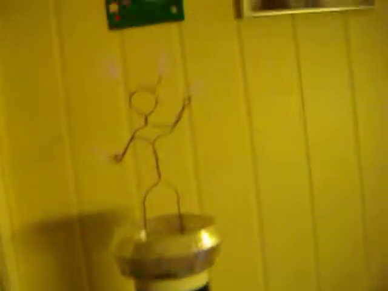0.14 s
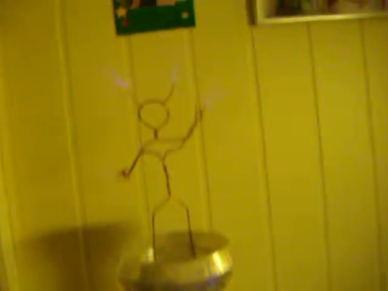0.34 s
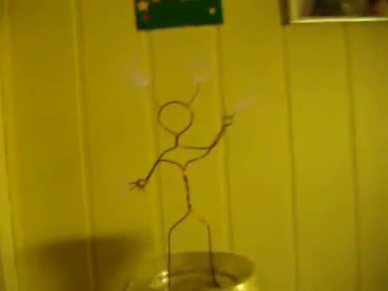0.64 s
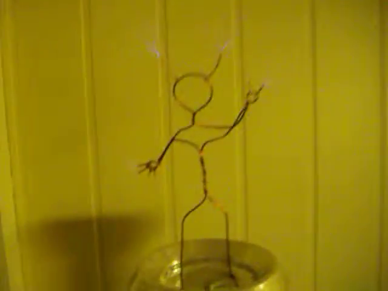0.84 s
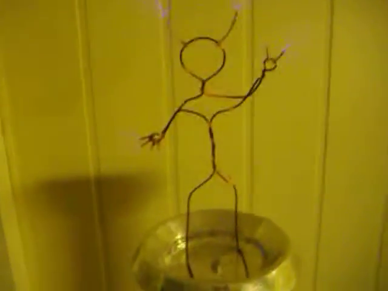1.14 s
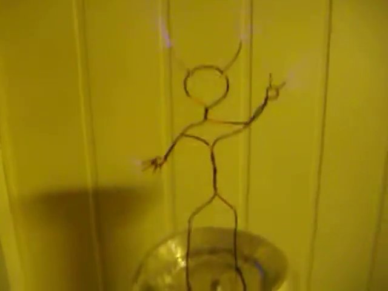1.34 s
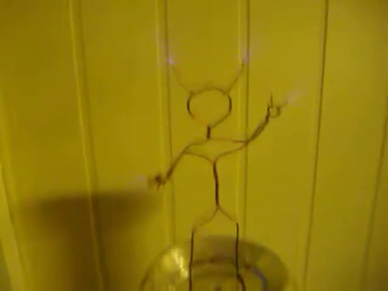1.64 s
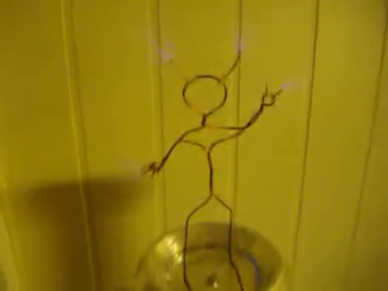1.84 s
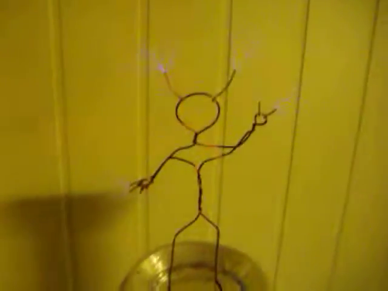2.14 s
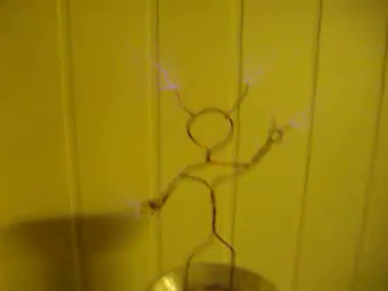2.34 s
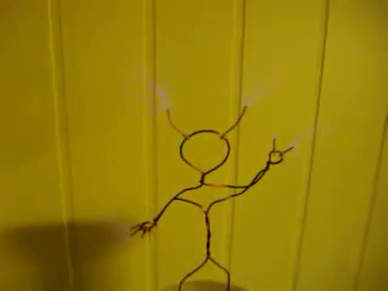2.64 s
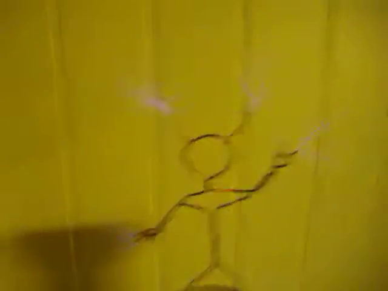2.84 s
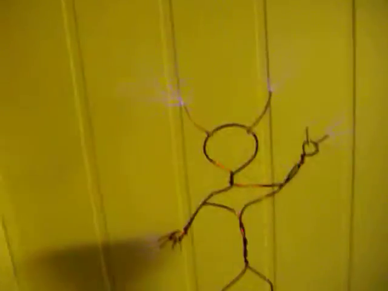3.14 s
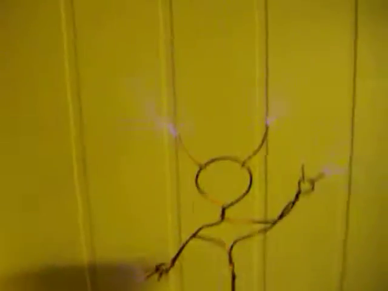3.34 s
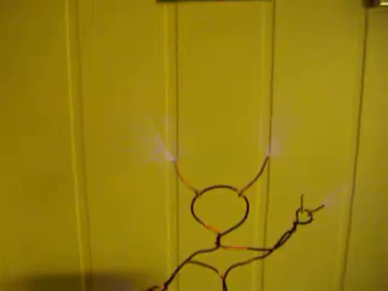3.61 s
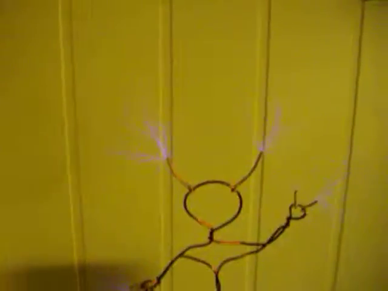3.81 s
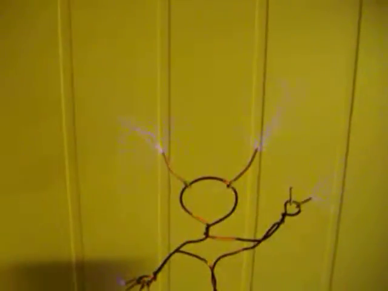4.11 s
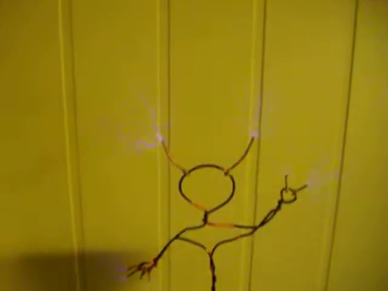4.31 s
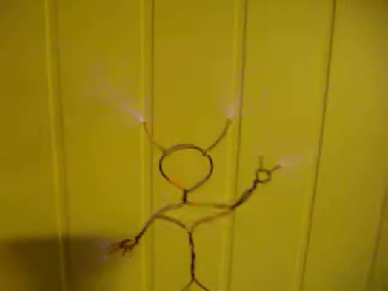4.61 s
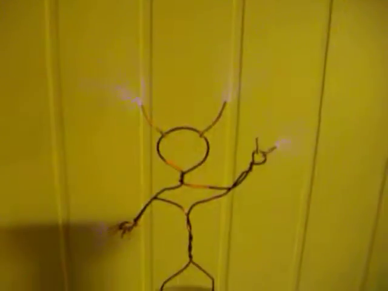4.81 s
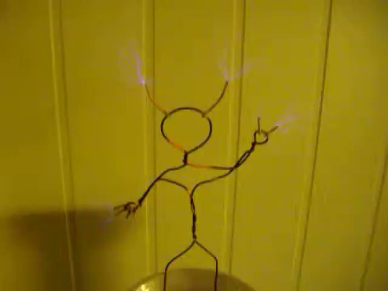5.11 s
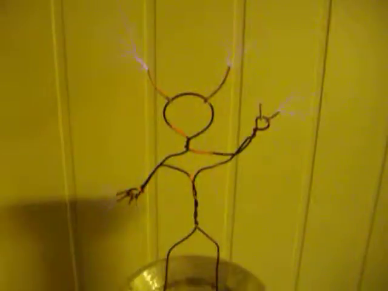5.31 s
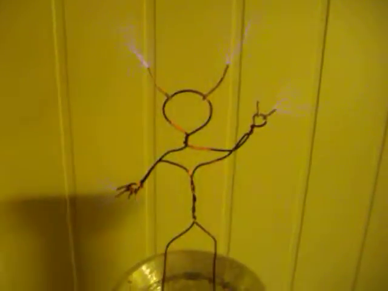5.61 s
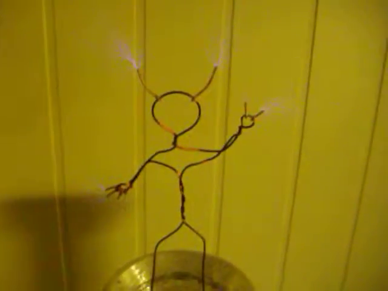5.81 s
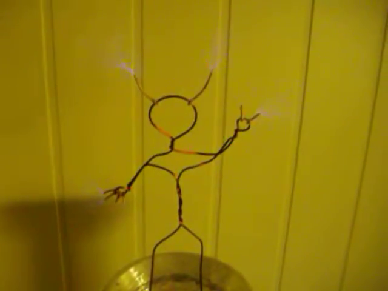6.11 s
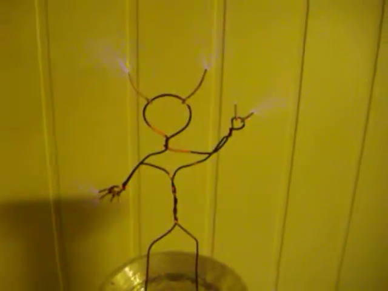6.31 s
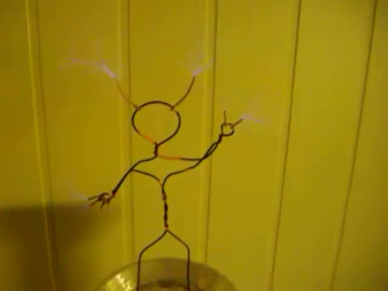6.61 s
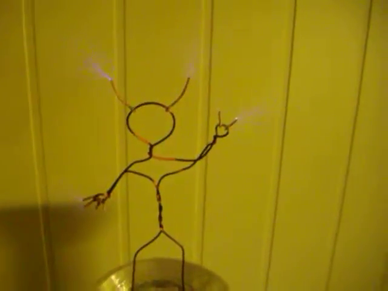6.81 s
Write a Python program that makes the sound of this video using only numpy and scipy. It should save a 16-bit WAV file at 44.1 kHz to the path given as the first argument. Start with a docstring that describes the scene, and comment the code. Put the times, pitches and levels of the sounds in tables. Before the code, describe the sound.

A spark-gap coil runs nonstop, a raw, rasping machine-gun rattle of electric snaps, boxy and overloaded, turning brighter and crisper as the microphone nears.

```python
"""Sharp bangs rattle at about a hundred a second: a spark-gap coil heard in a small panelled room.
The gap breaks down once in most half-cycles of the mains, at times twice. Each bang is an impulse that
excites resonances, with a snap of streamers, echoes off nearby surfaces and decaying-noise reverberation.
A hand-held microphone comes closer; beneath lie transformer hum and a low rumble.
A voice-band converter limits the band, and the strongest bangs clip."""
import sys
import numpy as np
from scipy import signal
from scipy.fft import rfft, irfft, next_fast_len
from scipy.io import wavfile
from scipy.ndimage import map_coordinates

SR = 44100
rng = np.random.default_rng(int(sys.argv[2]) if len(sys.argv) > 2 else 0)


def output_pcm(signal):
    """Save a mono or channel-first signal as 16-bit PCM at the path in sys.argv[1].

    Samples are clipped to [-1, 1] before scaling.
    """
    pcm = np.clip(np.atleast_2d(signal).T, -1, 1) * 32767
    wavfile.write(sys.argv[1], SR, np.round(pcm).astype(np.int16))


N = 306495

FIRING_HZ = 99.93  # half-cycles of the mains a second
LAG = .40  # mean moment of firing (share of a half-cycle)
CEILING = .71  # level at which the recorder clips
RISE_S = .0002  # the recorded peak comes this long after the bang arrives
# running coil: (time [s], mean bang [dB re ceiling], thump re crack at the ceiling [dB], closeness [0-1])
COIL = [(0, -2.5, -1, 0.34), (.6, -3, 0, 0.39), (1.2, -2, 2, 0.4), (2, -2, 2.5, 0.57),
        (2.6, -0.5, 3.5, 0.61), (3.5, -0.3, -2, 0.83), (4.5, 0.6, -1, 0.74), (5.5, -1, -0.5, 0.83),
        (6.95, -0.7, 1, 0.72)]
# low resonance that sinks as the microphone sets off: (time [s], centre [Hz], width [Hz], level [dB])
SINKING = [(.1, 975, 73, 8.5), (.45, 923, 108.4, 8.5), (.75, 866, 71.5, 6.5), (1.3, 840, 80.6, -4)]
SINKING_END_S = 1.8  # gone by then
# voice-band converter: (frequency [Hz], gain [dB])
BAND_EDGE = [(20, -26), (250, 0), (450, 4.5), (550, 2), (4800, 4), (5200, -0.5), (5600, -8.5),
             (5800, -17.5), (6000, -19), (6400, -44.5), (7000, -75.5), (22050, -120)]


def amp(db):
    """Decibels are twenty times the logarithm of an amplitude ratio; this inverts them."""
    return 10 ** (np.asarray(db) / 20)


def along(points, hz):
    """Linear interpolation of (frequency [Hz], value) points on a logarithmic frequency axis."""
    f, v = np.transpose(points)
    return np.interp(np.log(hz + 1), np.log(f + 1), v)


def read(rows, s):
    """Linear interpolation in time of each column of a curve, at the times s."""
    at, *columns = np.transpose(rows)
    return [np.interp(s, at, column) for column in columns]


def filtered(x, response):
    """Linear filtering: the spectrum of x times a complex frequency response."""
    size = 2 * next_fast_len(N // 2 + SR // 4)
    hz = np.fft.rfftfreq(size, 1 / SR)
    return irfft(rfft(x, size) * response(hz), size)[..., :N]


def resonances(modes):
    """Superposition of damped second-order resonators (centre [Hz], width [Hz], level [dB])."""
    return lambda f: sum(amp(db) * 1j * f * w / (hz * hz - f * f + 1j * f * w) for hz, w, db in modes)


def causal(points):
    """Minimum phase: folding the cepstrum makes the given (frequency [Hz], gain [dB]) causal."""
    def response(hz):
        cepstrum = irfft(along(points, hz) * np.log(10) / 20)
        half = len(cepstrum) // 2
        return np.exp(rfft(cepstrum * np.r_[1, np.full(half - 1, 2), 1, np.zeros(half - 1)]))
    return response


def pulses(s, size):
    """Band-limited interpolation: windowed sinc impulses fall between the samples."""
    at = s * SR
    taps = np.floor(at)[:, None] + np.arange(-7, 9)
    offset = taps - at[:, None]
    shape = np.sinc(offset) * np.cos(np.pi * offset / 16) ** 2
    index = np.clip(taps, 0, N).astype(int).ravel()
    return np.bincount(index, (size[:, None] * shape).ravel(), N + 1)[:N]


def height(response):
    """Peak of the impulse response: the recorded pressure of a unit bang with this response."""
    click = filtered(signal.unit_impulse(N), lambda hz: response(hz) * causal(BAND_EDGE)(hz))
    return click[:round(2 * RISE_S * SR)].max()


def firings():
    """Gap breakdown and recharge: times and strengths (dB re ceiling) of all bangs."""
    # bangs that stand out as overloads: (time [s], level [dB over the ceiling])
    hard_bangs = [(0.6338, 0.1), (1.0846, 1.2), (1.6944, 0.9), (1.815, 1.8), (1.9448, 0.9), (2.1253, 0.8),
                  (2.3051, 1.3), (2.3463, 2.1), (2.5051, 0.8), (2.6257, 2.5), (2.7862, 1.3), (2.8461, 1.4),
                  (2.8659, 1.6), (2.926, 2.0), (2.936, 2.0), (2.9462, 2.5), (3.0062, 1.8), (3.0857, 1.9),
                  (3.0957, 1.9), (3.1463, 1.5), (3.2159, 1.9), (3.2856, 1.8), (3.3258, 1.3), (3.4373, 1.7),
                  (3.4964, 1.5), (3.6859, 1.4), (3.766, 1.8), (3.9674, 2.1), (4.006, 1.7), (4.0972, 1.8),
                  (4.287, 2.0), (4.3084, 1.5), (4.3265, 2.1), (4.3666, 1.4), (4.458, 1.4), (4.5344, 2.4),
                  (4.6176, 2.2), (4.6874, 1.6), (4.7179, 1.4), (4.8083, 2.8), (4.8273, 1.6), (4.8679, 1.6),
                  (4.8781, 1.6), (4.9274, 1.9), (4.9682, 2.0), (4.9978, 1.7), (5.0088, 2.6), (5.0278, 1.9),
                  (5.0385, 1.4), (5.0577, 1.5), (5.068, 1.9), (5.1375, 1.7), (5.1683, 2.4), (5.2776, 1.6),
                  (5.3081, 2.3), (5.3775, 1.7), (5.3882, 1.3), (5.4276, 1.9), (5.4491, 1.6), (5.5379, 1.6),
                  (5.5487, 1.5), (5.6078, 2.3), (5.6279, 1.6), (5.6671, 1.6), (5.7478, 1.6), (5.7697, 2.3),
                  (5.7973, 1.4), (5.8504, 1.5), (5.8672, 2.2), (5.8977, 2.7), (5.9281, 2.3), (5.9682, 1.9),
                  (5.9876, 2.1), (6.0288, 1.8), (6.1485, 2.5), (6.2099, 1.5), (6.249, 2.7), (6.3186, 1.3),
                  (6.3791, 2.4), (6.4295, 2.1), (6.4688, 2.3), (6.4992, 2.2), (6.5984, 1.7), (6.6089, 2.1),
                  (6.6286, 2.4), (6.7487, 2.3), (6.7707, 1.9), (6.8386, 1.8), (6.8488, 1.4), (6.8698, 2.6),
                  (6.8895, 1.5), (6.9105, 2.4)]
    # strongest second firings: (time [s], level [dB re ceiling])
    double_bangs = [(0.0775, -3.2), (0.1371, -1.2), (0.3263, -0.4), (0.3465, -2.2), (0.387, -3.3),
                    (0.4159, -2.0), (0.4366, -2.2), (0.4574, -2.5), (0.5062, -1.9), (0.5558, -3.4),
                    (0.6973, -0.9), (0.7372, -3.6), (0.7869, -2.1), (0.8771, -3.5), (0.906, -2.2),
                    (0.927, -1.7), (1.0067, -2.2), (1.148, -2.7), (1.1688, -2.7), (1.1861, -1.2),
                    (1.208, -1.2), (1.3272, -2.8), (1.3979, -3.2), (1.4467, -1.4), (1.5068, -2.7),
                    (1.5878, -2.9), (1.617, -3.2), (1.6971, -3.1), (1.7273, -3.2), (1.8973, -3.4),
                    (1.948, -3.1), (2.31, -1.9), (2.3271, -1.6), (2.418, -1.2), (2.5175, -0.3),
                    (2.5581, -4.9), (2.6787, -3.8), (2.7091, -3.7), (2.7388, -4.0), (2.8089, -5.3),
                    (2.9692, -3.9), (3.0296, -3.9), (3.0597, -3.0), (3.1599, -3.9), (3.178, -2.8),
                    (3.2284, -5.3), (3.2585, -2.4), (3.3305, -5.1), (3.3688, -1.6), (3.4177, -1.4),
                    (3.5988, -4.8), (3.6397, -4.5), (3.7202, -5.3), (3.7973, -8.5), (4.0096, -5.2),
                    (4.0503, -2.4), (4.0785, -3.7), (4.1391, -3.5), (4.1796, -5.5), (4.2996, -3.7),
                    (4.5193, -2.0), (4.5379, -1.0), (4.5699, -2.9), (4.5982, -1.4), (4.6493, -5.0),
                    (5.0902, -3.4), (5.1503, -2.9), (5.5804, -2.5), (5.6415, -5.6), (5.6795, -3.6),
                    (5.7112, -2.6), (5.7599, -2.3), (5.8009, -5.6), (5.8296, -2.3), (6.0811, -3.6),
                    (6.1203, -3.6), (6.1387, -3.5), (6.2004, -1.9), (6.2804, -4.1), (6.5514, -2.9),
                    (6.5816, -3.1), (6.6416, -3.9), (6.7208, -3.8), (6.7385, -2.8), (6.7603, -2.9),
                    (6.942, -5.5)]
    # half-cycles without their usual firing: (time [s])
    skipped = [3.787, 4.527, 6.128, 6.729]
    # chance of a further, weaker second firing where none is excluded: (time [s], chance [0-1])
    twice_chance = [(0, .8), (1.3, .6), (1.6, .2), (2.5, .12), (2.7, .04)]
    # upper limit of an ordinary first bang: (time [s], level [dB re ceiling])
    usual_top = [(1, -2), (2.7, .6)]
    # single firing: (time [s], mean moment [share of a half-cycle], scatter [share of a half-cycle])
    timing = [(0, .41, .028), (1.2, .37, .028), (3, .39, .045), (6.95, .40, .06)]
    # a later breakdown has charged further: (time [s], gain for one scatter of delay [dB])
    later_gain = [(2.5, 0), (4, .9)]
    early, late = .055, .085  # lead before a second firing, lag after one (shares of a half-cycle)
    spread_db, drain = 1.5, .6  # scatter of bangs; share of a bang's surplus the next one lacks
    second_mean_db, second_spread_db = -3, 2.2  # second firing re the mean bang, and its scatter
    strong_wait_s = .0028  # least wait before a strong second firing
    recharge_s, recharge_spread_s, recharge_min_s = .0031, .0006, .0022

    cycle = np.arange(int(N / SR * FIRING_HZ))
    cycle_s = cycle / FIRING_HZ
    luck, spread = rng.random(len(cycle)), rng.standard_normal((len(cycle), 4))
    level_db = read(COIL, cycle_s)[0]
    twice, = read(twice_chance, cycle_s)
    top_db, = read(usual_top, cycle_s)

    def slot(s, lag):
        return np.clip(np.round(s * FIRING_HZ - lag).astype(int), 0, len(cycle) - 1)

    hard, hard_db = np.transpose(hard_bangs)
    double, double_db = np.transpose(double_bangs)
    at_hard, at_double = slot(hard, LAG), slot(double, LAG + .2)

    # a double firing drains the charge: no further double is drawn next to one
    listed = np.isin(cycle, at_double)
    again = (luck < twice) & ~np.roll(listed, 1) & ~np.roll(listed, -1)
    for k in cycle[1:]:
        again[k] &= ~again[k - 1]
    again[at_double] = True

    # an early breakdown leaves time to recharge and fire again; the next half-cycle then starts late
    moment, scatter = read(timing, cycle_s)
    stray = np.where(spread[:, 0] > 0, 1.3, .7)  # late ones stray further
    delay = np.where(again, -abs(spread[:, 0]) / 2, spread[:, 0] * stray)
    shift = scatter * delay - early * again + late * np.roll(again, 1)
    first = (cycle + moment + shift) / FIRING_HZ

    level_db = level_db + read(later_gain, first)[0] * delay
    surplus = spread[:, 1] - drain * np.roll(spread[:, 1] + again, 1)
    first_db = np.minimum(level_db + spread_db * np.minimum(surplus, 1), top_db)
    recharge = np.maximum(recharge_s + recharge_spread_s * spread[:, 2], recharge_min_s)
    first[at_double] = np.minimum(first[at_double], double - strong_wait_s)
    first[at_hard], first_db[at_hard] = hard, hard_db

    second = first + recharge
    second_db = np.minimum(level_db + second_mean_db + second_spread_db * spread[:, 3], level_db)
    second[at_double], second_db[at_double] = double, double_db

    fired = ~np.isin(cycle, np.setdiff1d(slot(np.array(skipped), LAG), at_hard))
    times = np.r_[first[fired], second[again]] - RISE_S
    return times, np.r_[first_db[fired], second_db[again]]


def bangs():
    """Impulse excitation: each firing drives crack, thump and rings, with streamers and early echoes."""
    # microphone port, upper resonances near and far: (centre [Hz], width [Hz], level [dB])
    near_port, far_port = [(2840, 1360, -3.5), (4110, 530, -4.5)], [(2730, 2500, 2), (3900, 1400, -5)]
    # recorder body, lower resonances: (centre [Hz], width [Hz], level [dB])
    near_body = [(292, 920, -6), (721, 347, 5), (950, 3900, -7)]
    # snap of the streamers: (time [s], mean level re the bang [dB])
    streamers = [(0, -19), (1, -19), (4, -12.5), (5, -7.5), (6.95, -6.5)]
    snap_delay_s, snap_jitter_s, snap_spread_db = .00029, .00004, 2

    s, db = firings()
    luck = rng.standard_normal((len(s), 3))
    _, thump_db, closeness = read(COIL, s)
    times, gains = paths(s)
    # a longer arc heats more air: the thump grows faster than the crack
    heat = amp(thump_db + 0.46 * db + 0.98 * luck[:, 0])
    low = np.interp(closeness, [0, 1], [height(far_thump), height(resonances(near_body))])
    for share, row in zip(stations(s), SINKING):
        low += share * height(resonances([row[1:]]))
    high = np.interp(closeness, [0, 1], [height(resonances(far_port)), height(resonances(near_port))])
    sharp = CEILING * amp(db) / (high + heat * low)  # crack and thump together make up the peak

    # the streamers at the wire tips lie at other distances than the gap
    snap_db, = read(streamers, s)
    late = np.resize(snap_delay_s + snap_jitter_s * luck[:, 1], len(times))
    snap = np.resize(sharp * amp(snap_db + snap_spread_db * luck[:, 2]), len(times)) * gains
    crack = pulses(times, np.resize(sharp, len(times)) * gains) + pulses(times + late, snap)
    thump = pulses(times, np.resize(sharp * heat, len(times)) * gains)

    # cross-fade from far to near
    close = np.clip(read(COIL, np.arange(N) / SR)[2], 0, 1)
    body = filtered(close * thump, resonances(near_body)) + filtered((1 - close) * thump, far_thump)
    port = filtered(close * crack, resonances(near_port))
    port += filtered((1 - close) * crack, resonances(far_port))
    return -(port + body + sinking_resonance(thump) + bowl_rings(s, sharp))


def paths(s):
    """Specular reflection: arrival times and gains by the direct path, the wall and six surfaces."""
    # echo of the panels behind the coil: (time [s], level [dB])
    wall_level = [(0, -9), (1, -7.5), (1.9, -5.5), (2.9, -7), (3.8, -6), (4.6, -7.5), (6.95, -8)]
    wall_delay_s = .00144
    # six more surfaces as the microphone moves: (time [s], then six pairs of delay [ms], level [dB])
    near_surfaces = [(.1, .73, -16, 3, -17.5, 2.8, -25, 2.7, -20.5, 4.7, -16.5, 7.7, -13),
                     (.5, .73, -17, 2.11, -11.5, 2.3, -20, 3.2, -12.5, 5.3, -23, 6.3, -29),
                     (.95, .75, -15, 1.6, -25, 2.23, -14.5, 3.2, -17, 4.7, -29.5, 5.7, -32),
                     (1.3, .73, -16, 2.2, -15, 2.3, -16, 3.27, -12.5, 5.4, -26, 6.8, -15),
                     (1.7, .75, -27, 1.6, -17, 2.64, -22, 3.33, -15.5, 4.8, -19, 9.9, -9),
                     (2.15, .75, -26, 2.23, -27.5, 2.83, -20.5, 3.36, -17.5, 5.44, -23, 6.6, -17),
                     (2.55, 0.8, -18.5, 2.4, -24, 3.27, -16, 3.38, -20.5, 5.42, -23.5, 7.6, -15),
                     (2.9, 0.934, -18.5, 1.9, -14.5, 2.7, -18, 3, -20, 5.53, -17.5, 7.4, -17),
                     (3.3, .9, -28, 2.09, -19, 3.2, -28, 3.47, -22, 5.51, -15, 9.5, -22),
                     (3.75, 0.76, -27, 2.09, -18, 3.54, -12.5, 2.8, -19, 5.1, -20.5, 9.7, -16),
                     (4.3, .92, -22.5, 2.02, -20, 3.02, -13.5, 2.1, -43, 5, -20.5, 7.15, -23),
                     (4.9, .94, -17, 1.4, -16, 3, -19, 1.8, -28.5, 5.16, -21.5, 7.5, -17.5),
                     (5.8, 0.98, -16.5, 1.863, -12.5, 2.93, -17.5, 3.7, -26, 5.14, -16.5, 7.4, -17),
                     (6.95, 0.95, -15.5, 1.84, -15.5, 2.92, -17, 3, -22, 4.9, -25.5, 7.55, -15)]
    moving = np.array(read(near_surfaces, s))
    times = np.r_[s, s + wall_delay_s, (s + moving[::2] / 1000).ravel()]
    gains = np.r_[np.ones(len(s)), amp(read(wall_level, s)[0]), amp(moving[1::2]).ravel()]
    return times, gains


def far_thump(hz, cut_hz=420):
    """Resonance under a second-order high-pass: from farther off the thump loses its bass."""
    # lower resonance from farther off: (centre [Hz], width [Hz], level [dB])
    far_body = [(640, 210, 3)]
    return resonances(far_body)(hz) * (1j * hz / (cut_hz + 1j * hz)) ** 2


def stations(s):
    """Linear cross-fade: share of each station of the sinking resonance at the times s."""
    at = [row[0] for row in SINKING] + [SINKING_END_S]
    return [np.interp(s, at, share) for share in np.eye(len(at))[:-1]]


def sinking_resonance(thump):
    """A moving resonance as a cross-fade of fixed resonators, each driven by its share of the thump."""
    shares = stations(np.arange(N) / SR)
    return sum(filtered(share * thump, resonances([row[1:]])) for share, row in zip(shares, SINKING))


def bowl_rings(s, sharp):
    """Cascaded resonance: squared narrow responses let each ring build up before it decays."""
    # metal bowl and panels: (centre [Hz], width of each of two cascaded resonators [Hz])
    bowl_modes = [(535, 25), (1012.5, 123), (1156, 230), (2379, 110), (2900, 90), (3420, 330)]
    # ring strengths change with the microphone's place: (time [s], level of each of six rings [dB])
    bowl_levels = [(0, 7, -10, -10.5, -4.5, -16.5, -14.5), (1.3, 3.5, -1.5, 2.5, -3, -20.5, -17),
                   (1.9, -1, 9.5, -0.5, 4.5, -11, -15), (3.2, -11, 5.5, 1.5, 4.5, -7.5, -4),
                   (3.6, -8.5, 3, -2.5, -0.5, -2.5, -14), (6.95, -11, 0.5, -2, 2.5, -18, -11.5)]
    ring = np.zeros(N)
    for (hz, width), db in zip(bowl_modes, read(bowl_levels, s)):
        mode = resonances([(hz, width, 0)])
        ring += filtered(pulses(s, sharp * amp(db)), lambda f: mode(f) ** 2)
    return ring


def room(x):
    """Diffuse reverberation: convolution with decaying noise, drawn anew for each microphone place."""
    # bands: (frequency [Hz], 60 dB decay time [s], relative level [dB])
    room_bands = [(100, 0.091, -5), (250, 0.18, 2.5), (580, 0.18, 1.5), (1650, 0.7, -0.5), (3160, 0.7, -2),
                  (4600, 0.93, -14.5), (6060, 0.29, -5)]
    # reverberation: (time [s], gain [dB])
    room_gain = [(1, -11), (2, -12), (3, -13.7), (4, -14.7), (5.2, -14.8)]
    stance_s = .29  # the microphone reaches a new place this often
    marks, wet = np.r_[0:N:round(stance_s * SR), N], np.zeros(N + SR)
    for start, end in zip(marks[:-1], marks[1:]):
        hz, t, noise = signal.stft(rng.standard_normal(SR // 2), SR, nperseg=256)
        t60, level_db = read(room_bands, hz[:, None])
        tail = signal.istft(noise * amp(level_db - 60 * t / t60), SR, nperseg=256)[1]
        tail = np.pad(tail / 20, (round(.003 * SR), 0))  # starts 3 ms after the direct sound
        part = signal.fftconvolve(x[start:end], tail)
        wet[start:start + len(part)] += part
    return wet[:N] * amp(read(room_gain, np.arange(N) / SR)[0])


def hum():
    """Harmonic series of the transformer core at twice the mains frequency, over a low noise rumble."""
    # transformer core: (multiple of the firing rate, relative level [dB])
    harmonics = [(1, 0), (2, -14), (3, -7), (4, -3)]
    # hum: (time [s], mean level of the fundamental [dB rms])
    hum_level = [(0, -58.5), (2.6, -57), (3.5, -65), (6.95, -63.5)]
    # rumble spectrum: (frequency [Hz], relative density [dB per Hz])
    rumble_spectrum = [(12, 5), (22, 12), (35, 6.5), (60, 2), (200, -7.5), (260, -11), (440, -120)]
    # rumble: (time [s], level [dB rms])
    rumble_level = [(1, -39), (2.6, -39), (3.3, -42), (4.5, -43.5), (6.5, -40.5)]
    waver_depth_db, waver_rate = 1.5, 7.7  # depth, and random knots a second
    t = np.arange(N) / SR
    line = np.zeros(N)
    for k, db in harmonics:
        waver_db = waver_depth_db * map_coordinates(rng.standard_normal(99), [t * waver_rate])
        phase = 2 * np.pi * k * (FIRING_HZ * t - LAG)  # in step with the firings
        line += np.sqrt(2) * amp(db + waver_db) * np.sin(phase)
    rumble = filtered(rng.standard_normal(N), lambda hz: amp(along(rumble_spectrum, hz)))
    rumble /= rumble.std()
    return amp(read(hum_level, t)[0]) * line + amp(read(rumble_level, t)[0]) * rumble


def scene():
    """Superposition of direct bangs, their reverberation, and the hum with its rumble."""
    bass_cut_hz = 91  # a small spark radiates little below this
    direct = filtered(bangs(), lambda hz: 1j * hz / (bass_cut_hz + 1j * hz))
    return (direct + room(direct) + hum())[None]


def record(dry):
    """Aliasing and saturation: mirrored band top, voice-band limit, small offset, clipping, low-pass."""
    converter_hz = 11025  # the band is mirrored about half this sampling rate
    mirror_db, mirror_hz = -2, 5700  # gain before the mixing, and upper edge of what is mirrored
    knee, top_hz = 40, 15950  # hardness of the clipping; final cut-off
    below = filtered(dry, causal([(20, 0), (mirror_hz - 400, 0), (mirror_hz, -6), (7000, -40)]))
    # the mirror's phase depends on the moment, so the band edge differs from bang to bang
    mirror = amp(mirror_db) * below * np.cos(2 * np.pi * converter_hz * np.arange(N) / SR)
    narrow = filtered(dry + mirror, causal(BAND_EDGE)) + .0045
    clipped = narrow / (1 + abs(narrow / CEILING) ** knee) ** (1 / knee)
    return filtered(clipped, lambda hz: hz < top_hz)


dry = scene()
out = record(dry)
output_pcm(out)
```